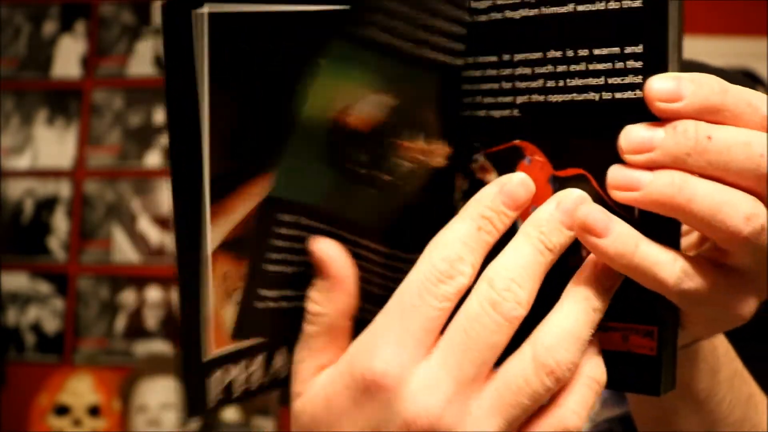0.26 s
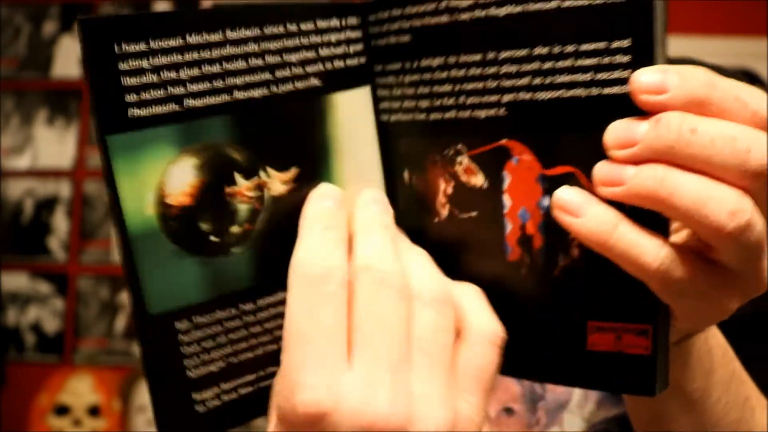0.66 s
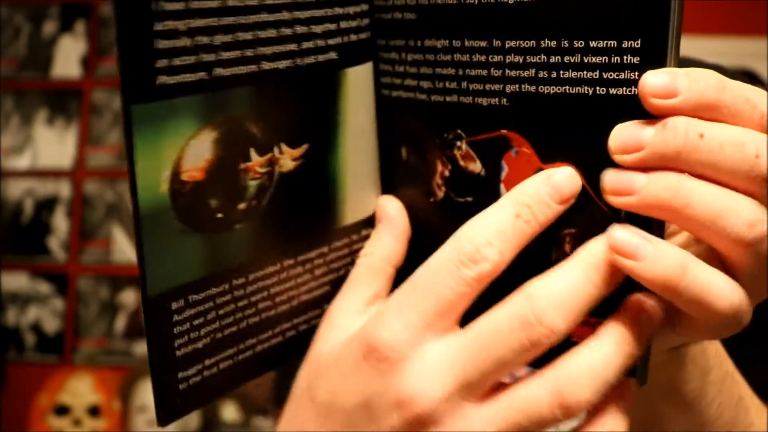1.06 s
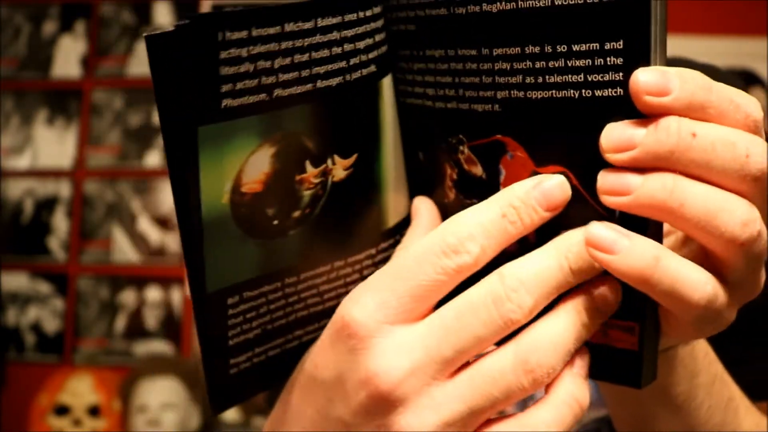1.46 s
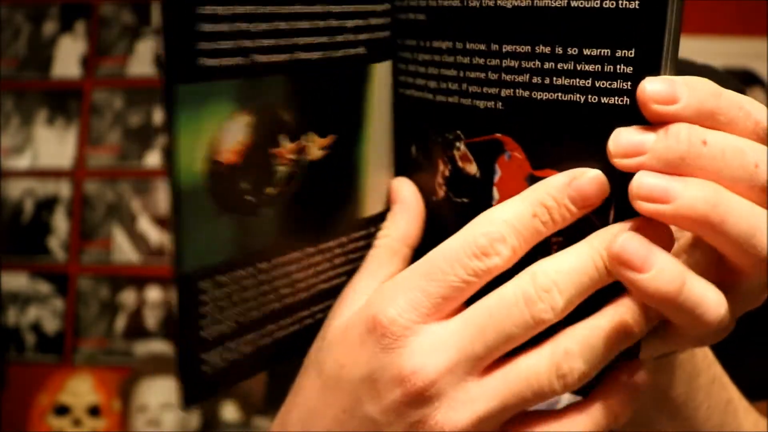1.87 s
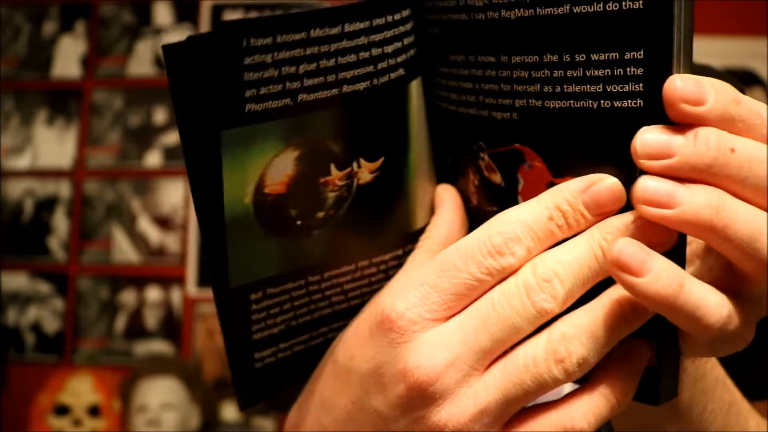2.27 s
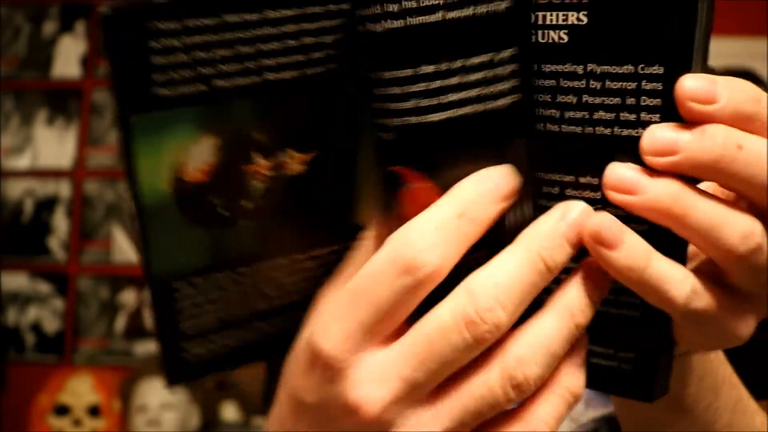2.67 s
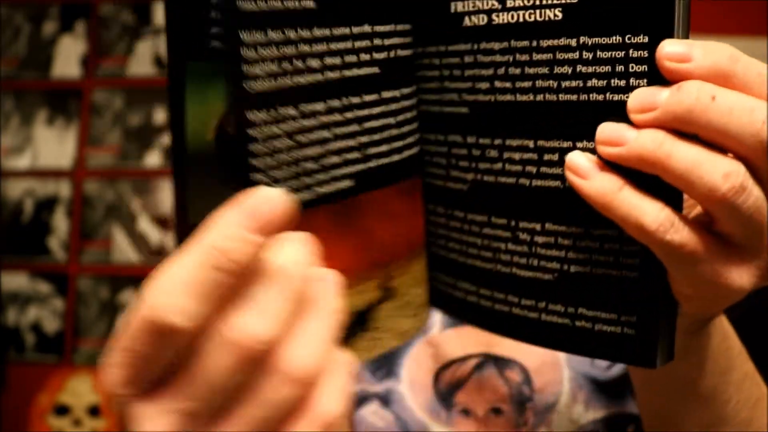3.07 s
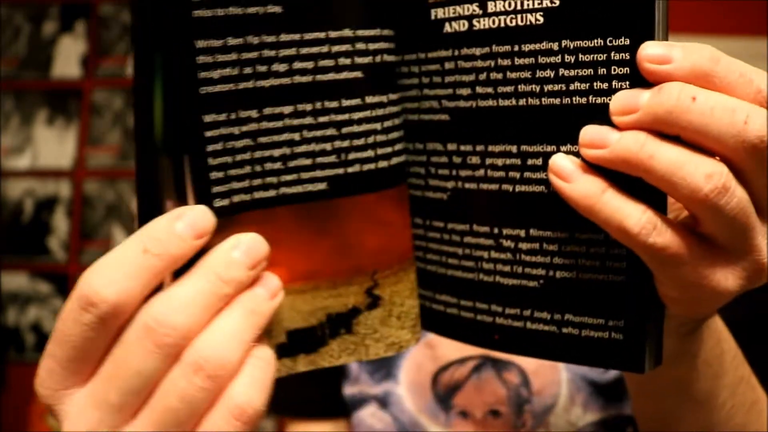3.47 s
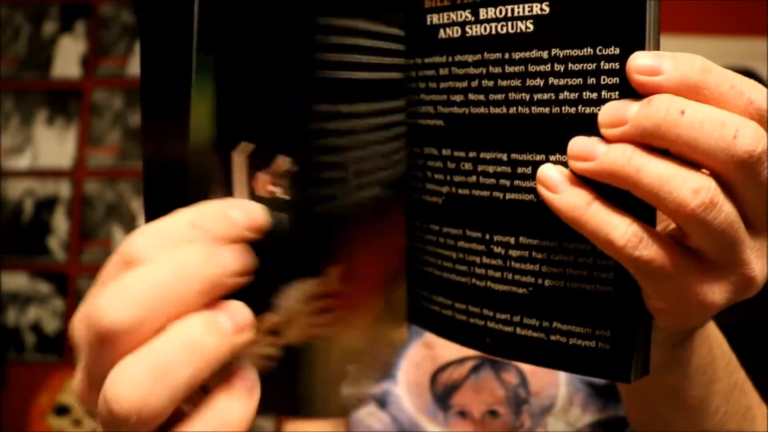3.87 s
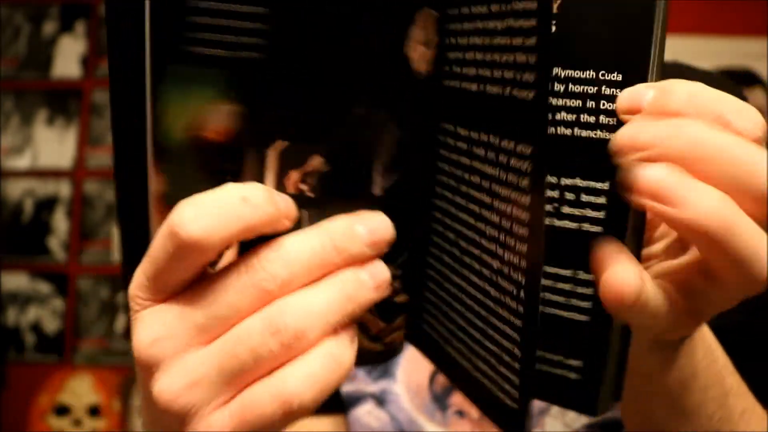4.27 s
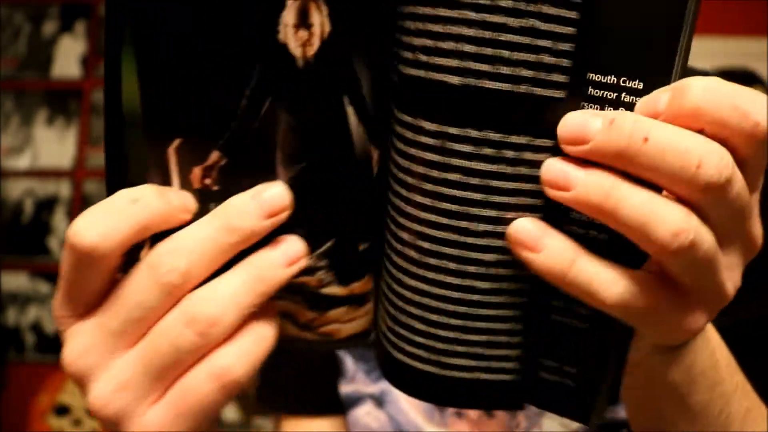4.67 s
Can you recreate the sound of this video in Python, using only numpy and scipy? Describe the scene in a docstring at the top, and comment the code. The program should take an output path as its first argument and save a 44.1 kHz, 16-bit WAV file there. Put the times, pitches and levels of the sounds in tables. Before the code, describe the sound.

A thick booklet with glossy pages is handled close to a stereo microphone in a small quiet room with faint, mostly low room tone. After brief stillness, short rubs and light crinkles begin at about 0.2 s, swelling into a fuller papery slide until 0.7 s. At 0.78 s a page snaps sharply, the loudest moment, with a soft thump under it, followed by a short swish. From 1 to 2.4 s the strokes are sparser and gentler, fingers smoothing the sheet with small ticks, and a brisker rub near 1.7 s. At 2.5 s the turning resumes: overlapping slides, rustles and small buckles, a crackle at 3.05 s, and two quick scrapes around 3.45 s. Between 3.7 and 4.1 s a page flexes with hollow puffs of air. A crisp double flick comes at 4.35 s, then swelling rustles and more crackles until nearly 4.8 s.

```python
"""Glossy pages of a thick booklet are turned by hand, close to a stereo microphone in a small quiet room.
Sheets slide over each other and fingers smooth them down, stroke by stroke: shaped noise grains hiss,
others ring the resonances of the bent sheet as rustle, and single ticks of crinkle stand out.
Brief narrow noise bands sing as sliding edges, damped sines with crackle flick as the paper buckles,
dull puffs are hands bumping the stack, and a hollow noise is the flexing page."""
import sys
import numpy as np
from scipy import signal
from scipy.io import wavfile

SR = 44100
rng = np.random.default_rng(int(sys.argv[2]) if len(sys.argv) > 2 else 0)


def persist_wave(psi):
    """Save psi, clipped to +-1, as 16-bit WAV."""
    counts = np.round(np.clip(psi, -1, 1) * 32767).astype(np.int16)
    wavfile.write(sys.argv[1], SR, np.atleast_2d(counts).T)


N = 212253  # length in samples

# quiet room, colour of its tone: (f/Hz, level per Hz/dB)
ROOM_TONE_COLOUR = [(22, -15), (43, -5.5), (70, -2), (120, -0.5), (220, -1), (310, -5), (470, 0),
                    (800, -10.5), (1350, -11), (2200, -9), (4000, -13), (8000, -17), (15000, -23)]
# quiet room, how alike left and right are: (f/Hz, likeness/1)
ROOM_LIKENESS = [(40, 0.4), (300, 0.48), (1000, 0.079), (3000, 0.12), (14000, 0)]
# flexing page, its colour: (f/Hz, level per Hz/dB)
FLEX_COLOUR = [(130, -2), (220, -5), (320, -1), (500, -0.5), (750, 2.5), (1000, 4), (1300, 2)]
# a page swings through the air, or pushes air out as it lands: (t/s, half length/s, level/dB)
PAGE_AIR = [(0.55, .09, -57), (0.701, 0.013, -45.5), (0.781, 0.0052, -38.5), (3.73, 0.0084, -45.5),
            (3.864, 0.032, -43.5), (3.97, 0.036, -40.5), (4.05, 0.037, -49.5)]
# strokes of a sheet or of fingers over paper: (start t/s, end t/s, attack/s, friction level before gain/dB,
# swell over the stroke/dB, then re friction, before offsets: rustle of the bent sheet/dB,
# hiss of the flat contact/dB, sizzle of the edge/dB; left over right/dB, left-right likeness of the hiss/1)
PAPER_STROKES = [(0.17, 0.209, .014, -43, 0, 9, -5, -22, -2, .6),
                 (0.221, 0.336, 0.01, -41.5, -4.5, 3, -2.5, -23, -2, 0.56),
                 (0.289, 0.563, 0.022, -38.5, 7.5, -1, 0.5, -10, -0.5, 0.36),
                 (0.56, 0.674, 0.035, -35.5, -7.5, 0, 2.5, -6.5, -1.5, 0.35),
                 (0.663, 0.71, 0.017, -34, -2, -15, -1.5, -23, 0, 0.43),
                 (0.748, 0.919, 0.016, -40, 4, -7, 1, -2.5, -2, 0.53),
                 (0.964, 1.010, 0.016, -41, -2, -7, -5, -4.5, -1.5, 0.54),
                 (1.082, 1.135, .02, -62.5, 1, 9, -11, -20, 0, .5),
                 (1.213, 1.412, .075, -43, -0.5, -4.5, -1, -12, 0, 0.57),
                 (1.534, 1.66, 0.0089, -52, 0.5, 0, -3.5, -19.5, -0.5, .45),
                 (1.704, 1.770, 0.047, -37.5, 3, -12, 1, -5.5, -1, .4),
                 (1.788, 1.836, 0.018, -49, 0, -22, 2.5, -6.5, -1, 0.57),
                 (1.915, 2.097, .006, -45, 6, -7, 1.5, -11.5, 0, 0.56),
                 (2.241, 2.342, 0.031, -46, 7, -4.5, -2, -15.5, -1.5, 0.36),
                 (2.47, 2.601, .014, -34.5, -2.5, -5, -3, -13.5, -2, 0.17),
                 (2.593, 2.683, 0.017, -44.5, 2, 1, -7.5, -22, -2, .1),
                 (2.661, 2.816, 0.044, -39, -8.5, -6, -3.5, -8, 0.5, 0.26),
                 (2.839, 2.97, .035, -40.5, 7.5, -7, -3.5, -5, 2.5, 0.38),
                 (2.964, 3.07, .02, -44, -5, -16, 0.5, -7, 1, .3),
                 (3.042, 3.172, 0.013, -43, 0.5, -7, -6, -21, 0.5, 0.36),
                 (3.215, 3.37, 0.0095, -46, 6.5, -2, -11, -32, 2, .3),
                 (3.425, 3.454, 0.013, -30.5, -3, -25, -2.5, -22, -1.5, 0.67),
                 (3.453, 3.491, 0.017, -32, -1, -6, -2, -15, -1.5, 0.35),
                 (3.571, 3.741, 0.029, -38, 1, -3, -6, -15.5, -0.5, 0.41),
                 (3.744, 3.907, 0.053, -40, -3, 1.5, -6.5, -16, 2, .2),
                 (3.903, 4.09, 0.048, -36.5, -8.5, 2.5, -4, -14, 1, 0.22),
                 (4.077, 4.257, 0.035, -46, -1, -1.5, -6, -18, 0.5, .2),
                 (4.26, 4.412, 0.031, -35, -5, -6.5, -4.5, -17.5, 2.5, .05),
                 (4.397, 4.517, 0.015, -45, -7.5, 2.5, -4, -12.5, 1.5, 0.18),
                 (4.494, 4.598, 0.032, -40.5, 10, -6.5, 0.5, -6, 0.5, .3),
                 (4.613, 4.702, 0.015, -42, 9, -0.5, -1.5, -10, -0.5, .35),
                 (4.712, 4.747, 0.012, -44, 0, 0, -6, -23, 1, .4),
                 (4.751, 4.806, 0.0092, -35.5, 1.5, -0.5, -0.5, -12.5, 0, .4)]
# sliding paper, its colour: (f/Hz, level per Hz/dB)
FRICTION_COLOUR = [(900, -17.5), (1600, -14.5), (2300, 1), (2850, 1), (3600, 1.5), (4700, -1), (6000, -4),
                   (7600, -2), (9000, -6.5), (11000, -10.5), (16000, -18.5)]
# paper, how alike left and right are before the cap in stereo(): (f/Hz, likeness/1)
PAPER_LIKENESS = [(100, 0.98), (700, 1), (1400, 0.54), (3500, 0.66), (7000, 0.29), (14000, 0.057)]
# friction, its place between the sides: (f/Hz, left over right level/dB)
FRICTION_BALANCE = [(200, 3.5), (700, 16), (1500, -16.5), (2600, -1.5), (4500, 1.5), (8000, 1.5),
                    (13000, 2)]
# bent sheet, its broad resonances: (f/Hz, width/Hz, level/dB)
SHEET_RESONANCES = [(1247, 375, 1), (1452, 133, 1.5), (1863, 580, 0)]
# paper buckling or slapping down: (t/s, level before gain/dB, f/Hz, ring time before scaling/s)
BUCKLES = [(0.173, -30.5, 1530, 0.03), (0.185, -29, 1710, .015), (0.3174, -27, 1030, 0.011),
           (0.7793, -13.5, 1160, 0.014), (0.788, -9, 2180, 0.0081), (0.9116, -20, 960, 0.0038),
           (1.5517, -31, 3260, 0.0051), (1.609, -33, 5000, 0.0045), (1.7458, -26, 3220, 0.0066),
           (1.746, -25, 686, 0.0047), (2.0973, -33, 4000, .0055), (2.266, -28, 3940, 0.0036),
           (2.264, -37, 1270, 0.015), (2.2726, -33, 3000, 0.0046), (2.738, -26.5, 1290, 0.033),
           (2.81, -33.5, 1250, .02), (2.859, -27, 1240, 0.016), (2.9657, -24, 1570, 0.019),
           (3.0565, -26.5, 3000, 0.038), (3.0593, -22.5, 2000, 0.0088), (4.0676, -24, 1400, 0.0069),
           (4.254, -35.5, 10000, .014), (4.3459, -22, 1310, 0.044), (4.3483, -19, 2080, 0.019),
           (4.3946, -26, 1430, 0.044), (4.558, -25, 1520, 0.012), (4.6255, -25, 1290, 0.0081),
           (4.701, -26, 460, 0.023), (4.76, -24, 4030, 0.029), (4.793, -20, 1270, .019)]
# soft bumps of hand and page on the stack: (t/s, peak level before gain/dB)
STACK_BUMPS = [(0.316, -38), (0.336, -52), (0.688, -42.5), (0.78, -32), (0.911, -39.5), (0.939, -58),
               (2.74, -44), (3.06, -39), (3.72, -45), (4.059, -43), (4.703, -46)]
# a sliding edge sings: (t/s, half length/s, f/Hz, level/dB)
SINGING_EDGES = [(0.472, 0.039, 5750, -37), (0.634, 0.019, 3700, -37.5), (0.706, 0.0083, 4200, -36),
                 (0.841, 0.011, 2280, -38.5), (0.902, 0.083, 2600, -49), (2.772, 0.021, 7400, -46.5),
                 (3.471, 0.028, 1980, -38), (3.733, 0.046, 8000, -44.5), (3.835, 0.023, 2070, -36.5),
                 (4.486, 0.12, 3470, -44)]

ROOM_TONE_DB = -53
FLEX_DB = -20.5  # flexing level relative to friction
FIRST_TOUCH_DB, FIRST_TOUCH_S = -13, 0.006  # surfaces graze just before a stroke takes hold
RELEASE_T60_S = 0.099  # a stroke runs out
USUAL_SPEED = 0.79  # share of full speed at which a stroke has its listed colour
SPEED_DB, SPEED_HISS_DB, SPEED_SIZZLE_DB = 1, 3, 3  # gained from rest to full speed
ROOM_T60_S, ROOM_DB = 0.28, -15.5  # tail of the room: decay time, level
CUTOFF_HZ = 15900


def from_db(db):
    """Decibels to gain."""
    return 10 ** (np.asarray(db) / 20)


def rms_one(x):
    """Scale to unit rms."""
    return x / np.sqrt(np.mean(x ** 2) + 1e-20)


def at_hz(points, hz):
    """Read a spectrum on a log-frequency axis."""
    table = np.array(points)
    return np.interp(np.log(hz), np.log(table[:, 0]), table[:, 1])


def panned(db):
    """Left and right gains for a level difference, positive towards the left."""
    return from_db(np.array([[.5], [-.5]]) * db)


def drift(rate):
    """Random line of rms 1 with a new corner rate times a second."""
    knots = rng.standard_normal(N // 20)
    return rms_one(np.interp(np.arange(N) * rate / SR, np.arange(len(knots)), knots))


def passed(x, hz, kind, order=2):
    """Butterworth filter."""
    sections = signal.butter(order, np.clip(hz, 10, .45 * SR), kind, fs=SR, output="sos")
    return signal.sosfilt(sections, x + 1e-18)


def add(track, s, sound):
    """Mix a short sound in at a time."""
    start = int(s * SR)
    track[..., start:start + sound.shape[-1]] += sound[..., :N - start]


def grains(size_db):
    """Two streams of tiny slips, dense as noise but uneven in size, which they share."""
    return rng.standard_normal((2, N)) * from_db(size_db * drift(1500))


def bands(spectrum, likeness, size_db):
    """Third-octave bands of grains as (Hz, mid, side, likeness), scaled so the mid powers sum to 1."""
    low, high = spectrum[0][0], spectrum[-1][0]
    edges = 1000 * 2 ** (np.arange(-16, 13) / 3)
    streams = [grains(size_db), grains(size_db)]  # neighbouring bands take different streams
    out, power = [], 0
    for k, (a, b) in enumerate(zip(edges, edges[1:])):
        hz = np.sqrt(a * b)
        if b > low and a < high:
            mid, side = from_db(at_hz(spectrum, hz)) * passed(streams[k % 2], [a, b], "band")
            out.append((hz, mid, side))
            power += np.mean(mid ** 2)
    scale = np.sqrt(power)
    return [(hz, mid / scale, side / scale, at_hz(likeness, hz)) for hz, mid, side in out]


def stereo(mid, side, alike):
    """Left and right with a given likeness."""
    alike = np.clip(alike, -.5, .97)
    return (np.sqrt(1 + alike) * mid + np.sqrt(1 - alike) * side * [[1], [-1]]) / np.sqrt(2)


def room_tone():
    """The quiet room is a steady, mostly low noise that differs between the sides."""
    air = sum(stereo(mid, side, alike)
              for hz, mid, side, alike in bands(ROOM_TONE_COLOUR, ROOM_LIKENESS, size_db=1.5))
    return from_db(ROOM_TONE_DB) * air


def sway(level_db, held_db):
    """Level of flexing and moved air, in dB: a little when held, more with strokes, swings and landings."""
    t = np.arange(N) / SR
    power = from_db(held_db) ** 2 + from_db(level_db + FLEX_DB) ** 2
    for s, half_s, db in PAGE_AIR:
        power = power + from_db(db) ** 2 * np.exp(-((t - s) / half_s) ** 2)
    return 10 * np.log10(power)


def flexing(level_db, size_db, patchy_db):
    """A page that flexes or moves the air gives a hollow, lumpy flutter, each band drifting in level."""
    out = sum(stereo(mid, side, alike) * from_db(patchy_db * drift(30))
              for hz, mid, side, alike in bands(FLEX_COLOUR, PAPER_LIKENESS, size_db))
    return out * from_db(level_db)


def strokes():
    """Each stroke sets in, swells or fades and runs out, brightest in the middle where it is fastest.
    Gives the summed level in dB, then rustle, hiss, sizzle, pan and likeness weighted by stroke power."""
    t, total, grip = np.arange(N) / SR, 0, 0
    for (s, end_s, attack_s, db, swell_db,
         rustle_db, hiss_db, sizzle_db, pan_db, alike) in PAPER_STROKES:
        progress = np.clip((t - s) / max(end_s - s, 1e-3), 0, 1)
        faster = np.sin(np.pi * progress) - USUAL_SPEED
        set_in = .5 + .5 * np.tanh(2 * (t - s) / attack_s - 1)
        graze = from_db(FIRST_TOUCH_DB) * np.exp(np.clip((t - s) / FIRST_TOUCH_S, -10, 0))
        run_out_db = -60 * np.clip((t - end_s) / RELEASE_T60_S, 0, 2)
        stroke_db = db + swell_db * (progress - .5) + SPEED_DB * faster + run_out_db
        power = (np.maximum(set_in, graze) * from_db(stroke_db)) ** 2
        hiss_now_db = hiss_db + SPEED_HISS_DB * faster
        sizzle_now_db = sizzle_db + SPEED_SIZZLE_DB * faster
        colour = np.broadcast_arrays(rustle_db, hiss_now_db, sizzle_now_db, pan_db, alike)
        total = total + power
        grip = grip + power * np.array(colour)
    return 10 * np.log10(total), *(grip / total)


def friction(level_db, hiss_db, sizzle_db, pan_db, hiss_alike, gain_db,
             usual_hiss_db, usual_sizzle_db, usual_alike, patchy_db):
    """Paper slides on paper or skin; the kind of contact sets the treble, and every band drifts in level."""
    out = 0
    for hz, mid, side, alike in bands(FRICTION_COLOUR, PAPER_LIKENESS, size_db=0.5):
        hiss_share = np.interp(hz, [4000, 6500, 8000, 10500], [0, 1, 1, 0])
        sizzle_share = np.interp(hz, [8000, 10500], [0, 1])
        colour_db = hiss_share * (hiss_db - usual_hiss_db) + sizzle_share * (sizzle_db - usual_sizzle_db)
        # short waves feel the direction of the edge more than long ones
        turned = (hiss_alike - usual_alike) * min(hz / 5000, 1)
        gain = from_db(colour_db + patchy_db * drift(25.017))
        out = out + gain * stereo(mid, side, alike + turned) * panned(at_hz(FRICTION_BALANCE, hz))
    return out * from_db(level_db + gain_db) * panned(pan_db)


def rustle(level_db, size_db, lowest_hz, alike, pan_db):
    """Slips shake the bent sheet, which radiates poorly below its first resonance."""
    slips, out = grains(size_db), 0
    for k, (hz, width_hz, db) in enumerate(SHEET_RESONANCES):
        ringing = signal.lfilter(*signal.iirpeak(hz, hz / width_hz, fs=SR), slips)
        out = out + (-1) ** k * from_db(db) * rms_one(ringing)  # alternating sign
    radiated = passed(out, lowest_hz, "high", order=4)
    mid, side = rms_one(passed(radiated, 2670, "low"))
    return stereo(mid, side, alike) * from_db(level_db) * panned(pan_db)


def crinkle(level_db, per_s, spread_db):
    """Single larger slips stand out of the hiss as tiny ticks, each with its own pitch and side."""
    t, out = np.arange(SR // 200) / SR, np.zeros((2, N))
    for when, pitch, size, side in rng.random((int(per_s * N / SR), 4)):
        hz = 1400 * 6 ** pitch
        tick = np.sin(2 * np.pi * hz * t) * np.exp(-t * hz / 2.0)
        tick_db = level_db[int(when * N)] + spread_db * size ** 2
        add(out, when * N / SR, tick * from_db(tick_db) * panned(8 * (side - .5)))
    return out


def flicks(gain_db, crackle_db, crackle_reach, pan_db):
    """A buckle rings the sheet briefly and throws off a burst of crackle from about that pitch upwards."""
    t, out = np.arange(SR // 20) / SR, np.zeros((2, N))
    for s, db, hz, ring_s in BUCKLES:
        snap = np.sin(2 * np.pi * hz * t) * from_db(-60 * t / (0.51 * ring_s))
        noise = rng.standard_normal((2, len(t)))
        burst = rms_one(passed(noise, [hz / 1.1, hz * max(crackle_reach, 1)], "band"))
        # the crackle dies away more slowly than the snap
        crackle = stereo(*burst, 0.42) * from_db(crackle_db - 60 * t / (2.26 * ring_s))
        add(out, s, from_db(db + gain_db) * passed(snap + crackle, hz / 3, "high", order=1))
    return out * panned(pan_db)


def room(x, wall_hz):
    """The small room returns a short dull tail, different at each side."""
    t = np.arange(SR // 3) / SR
    dull = passed(rng.standard_normal((2, len(t))), wall_hz, "low", order=1)
    tail = dull * from_db(-60 * t / ROOM_T60_S) * (t > .004)  # nothing in the first 4 ms
    tail /= np.sqrt(np.sum(tail ** 2, axis=1, keepdims=True))
    return signal.fftconvolve(x, tail, axes=1)[:, :N]


def bumps(low_hz, high_hz, t60, gain_db):
    """The thick stack damps a blow into a short dull puff."""
    t, out = np.arange(SR // 6) / SR, np.zeros((2, N))
    for s, db in STACK_BUMPS:
        push = rng.standard_normal((2, len(t))) * from_db(-60 * t / t60)
        puff = passed(stereo(*push, 1.0), high_hz, "low", order=1)
        puff = passed(puff, low_hz, "high")
        puff = passed(puff, 1160, "low")
        add(out, s, from_db(db + gain_db) * puff / np.abs(puff).max())
    return out


def squeaks(width_hz):
    """Slips fall roughly into step for a moment: a narrow, breathy noise band swells and fades."""
    t, out = np.arange(N) / SR, 0
    for s, half_s, hz, db in SINGING_EDGES:
        noise = rng.standard_normal((2, N))
        mid, side = rms_one(passed(noise, [hz - width_hz / 2, hz + width_hz / 2], "band"))
        out = out + stereo(mid, side, 0.85) * from_db(db) * np.exp(-.5 * ((t - s) / half_s) ** 2)
    return out


def scene():
    """Strokes drive hiss, rustle, crinkle and flexing together; flicks, bumps, squeaks and room are added."""
    level_db, rustle_db, hiss_db, sizzle_db, pan_db, hiss_alike = strokes()
    sway_db = sway(level_db, held_db=-62)
    level_db = level_db + 0.98 * drift(160) + 1.23 * drift(35)  # the slide catches and lets go
    paper = flexing(sway_db, size_db=5.5, patchy_db=3.5)
    paper += friction(level_db, hiss_db, sizzle_db, pan_db, hiss_alike, gain_db=1.37,
                      usual_hiss_db=-4.0, usual_sizzle_db=-12.0, usual_alike=0.34, patchy_db=2.22)
    paper += rustle(level_db + rustle_db - 3.5, size_db=2.0, lowest_hz=1023, alike=0.93, pan_db=-1.0)
    paper += crinkle(level_db - 1.5, per_s=45, spread_db=2.5)
    paper += flicks(gain_db=0.5, crackle_db=-12.5, crackle_reach=2.3, pan_db=-1.5)
    paper += bumps(low_hz=60, high_hz=244, t60=0.11, gain_db=1.0)
    paper += squeaks(width_hz=740)
    return paper + from_db(ROOM_DB) * room(paper, wall_hz=5900) + room_tone()


def record(dry):
    """The top is cut steeply by an elliptic low-pass."""
    return signal.sosfilt(signal.ellip(12, .1, 80, CUTOFF_HZ, fs=SR, output="sos"), dry)


dry = scene()
out = record(dry)
persist_wave(out)
```